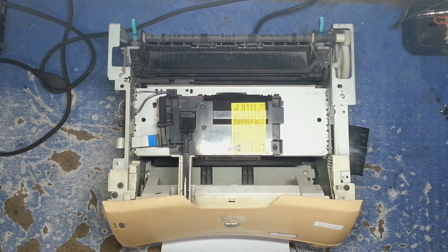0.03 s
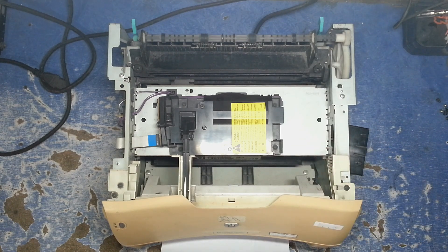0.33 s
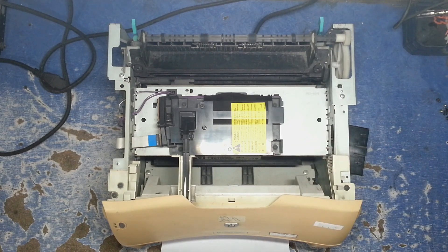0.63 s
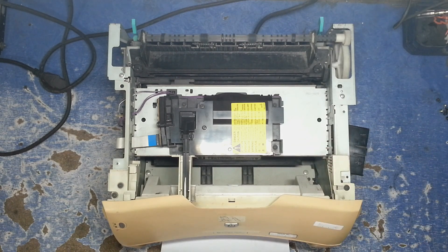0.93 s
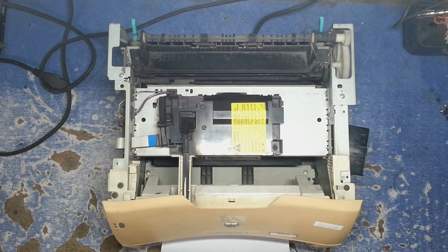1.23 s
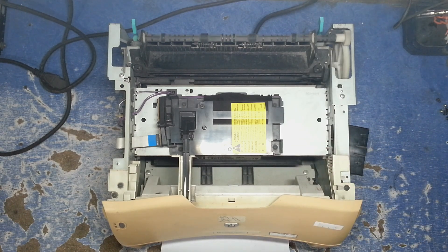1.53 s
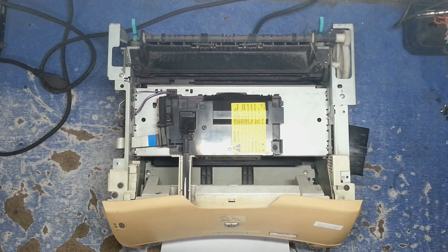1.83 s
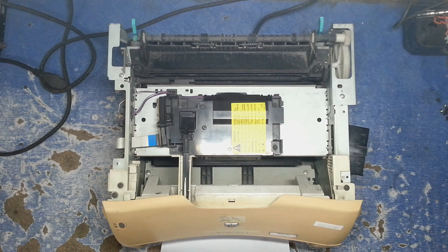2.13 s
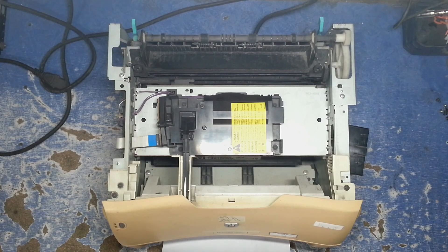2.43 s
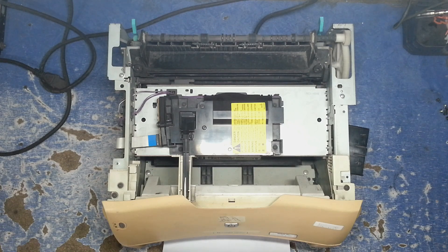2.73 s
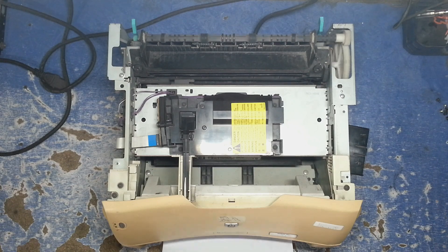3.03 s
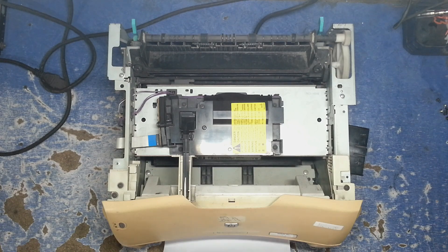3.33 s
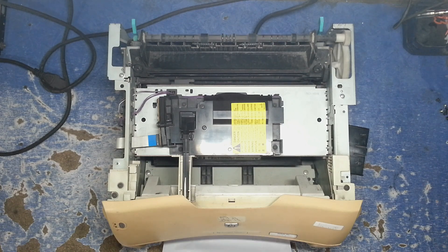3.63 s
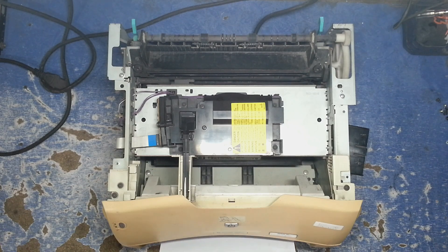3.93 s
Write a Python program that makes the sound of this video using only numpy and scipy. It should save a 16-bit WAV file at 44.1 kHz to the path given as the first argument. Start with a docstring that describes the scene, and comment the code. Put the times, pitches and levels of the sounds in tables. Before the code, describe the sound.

Close up in a small room, a laser printer whirs and whines while loose parts tap and a faint squeak rises. Then a solenoid snaps twice, a second apart, amid clacking levers, plastic latch clicks and rattling rollers.

```python
"""A motor whines and a plastic gear train whirs: an opened laser printer runs on a workshop floor.
Loose parts tap and a faint squeak rises. About two seconds in a solenoid snaps, and again a second later;
from the first snap on, the paper feed loads the gears, cams and levers clack and a sprung latch drops.
The stereo microphone is close, in a small room, with the machine a little to the right."""
import sys
import numpy as np
from scipy import signal
from scipy.fft import rfft, irfft, next_fast_len
from scipy.io import wavfile
from scipy.ndimage import map_coordinates

SR = 44100
rng = np.random.default_rng(int(sys.argv[2]) if len(sys.argv) > 2 else 0)


def waveform_to_disk(signal):
    """Save audio, clipped to [-1, 1], as 16-bit WAV at the path in sys.argv[1]."""
    frames = np.transpose(np.atleast_2d(signal))
    scaled = np.clip(frames, -1, 1) * 32767
    samples = np.round(scaled).astype(np.int16)
    wavfile.write(sys.argv[1], SR, samples)


N = 4 * SR

# load of the paper feed, heard as its rattle: time_s, level_db
FEED_LOAD = [(2.17, -58), (2.25, -40), (2.34, -39.5), (2.43, -30.5), (2.49, -43), (2.71, -45), (2.76, -36),
             (2.85, -37.5), (2.92, -45), (2.98, -33.5), (3.08, -43), (3.24, -30), (3.36, -38.5),
             (3.48, -37.5), (3.6, -49.5), (3.73, -48), (3.8, -35), (3.91, -39), (3.99, -32)]
# colour of the printer's frame: freq_hz, gain_db
FRAME_COLOUR = [(40, -36), (90, -7), (190, -9.5), (275, 2.5), (390, -1), (560, 3.5), (700, -6), (980, 3.5),
                (1150, 2.5), (1380, -8.5), (1650, -3), (2150, -3), (2700, -15.5), (4500, -24), (6300, -37),
                (9000, -30), (15000, -51.5)]
# where the microphone hears the frame: freq_hz, left_over_right_db
FRAME_PAN = [(100, 1), (300, 0.5), (1000, -4), (3500, -4.5), (12000, -12.5)]
FRAME_CUT_HZ = 150  # lowest pitch that the frame radiates well


def solenoid():
    """The steel armature slaps home in a few quick contacts and leaves its return spring sizzling."""
    # the solenoid pulls in: start_s, level_db, tilt_db_per_octave
    snaps = [(2.1873, -11.5, 0), (3.1781, -11.5, 0.7)]
    # the armature touches, seats and bounces: delay_s, gain_db
    contacts = [(.0005, 1.5), (.0033, 1), (.0062, -3.5), (0.0138, -11), (0.017, -15), (0.029, -20)]
    # ring of the armature: pitch_hz, gain_db, t60_s
    armature_modes = [(1556, 1, 0.05), (1650, 4, 0.059), (1794, 0, 0.034), (1925, -1, 0.03),
                      (2030, -1, 0.027), (2575, -4, 0.06), (2706, -11, 0.06), (3330, -17, 0.02),
                      (4370, -18.5, 0.059)]
    # crack of a contact: freq_hz, gain_db
    crack_colour = [(100, -46), (500, -29), (1000, -3.5), (1370, -12), (1620, 6), (2000, 7), (2300, -10),
                    (2600, 1), (3100, -12.5), (4100, -12), (5200, -20.5), (6200, -31.5), (8800, -17),
                    (11800, -24.5), (15000, -28.5)]
    # sizzle of the spring: freq_hz, gain_db
    spring_colour = [(2000, -55), (3600, 6), (5100, 5), (6300, -2), (8000, -2), (8900, -15), (10200, -11),
                     (11500, 6), (12600, -11), (14500, -9)]
    # where the microphone hears the snap: freq_hz, left_over_right_db
    snap_pan = [(60, 2), (150, 0.0), (380, 2), (950, -9), (2380, -2), (5980, -11.5), (15000, -20)]
    out = np.zeros((2, N))
    for start, db, tilt_db in snaps:
        for delay, contact_db in contacts:
            crack = blow(crack_colour, t60=0.027, tilt_db=tilt_db, modes=armature_modes, ring_db=0.5)
            add(out, start + delay, amp(db + contact_db - 4) * crack)
        spring_db = db - 26.5 + 6.1 * tilt_db  # a brighter snap sizzles louder
        add(out, start, amp(spring_db) * blow(spring_colour, t60=0.23))
    thin = low_cut(out, corner_hz=690)  # the small armature radiates no bass
    return in_room(spread(thin, snap_pan), wet_db=-11)


def latch():
    """A sprung plastic latch drops with a dry, bright snap."""
    # the latch drops: start_s, level_db, tilt_db_per_octave, t60_s, ring_db
    drops = [(2.9493, -23, -1, 0.057, 1.5), (3.410, -27, -3.5, 0.05, -2), (3.7516, -18.5, 2.5, 0.074, -3),
             (3.951, -28, 1.5, 0.082, -11)]
    # colour of the plastic: freq_hz, gain_db
    colour = [(60, -20), (170, -14), (300, -3), (600, 1.5), (750, -8), (1000, 2.5), (1380, -3), (1750, -3),
              (2100, 4), (2600, -10), (3000, -8.5), (3600, -17), (5300, -21), (6400, -32), (9000, -30.5),
              (15000, -45)]
    # its ring: pitch_hz, gain_db, t60_s
    modes = [(810, -2, 0.077), (986, 2, 0.079), (1132, 0.5, 0.069), (1590, 3, 0.032), (2090, 1.5, 0.044),
             (2207, -5, 0.038), (3017, -8, 0.064)]
    out = np.zeros((2, N))
    for start, db, tilt_db, t60, ring_db in drops:
        add(out, start, amp(db) * blow(colour, t60, tilt_db, modes, ring_db))
    return in_room(spread(low_cut(out, FRAME_CUT_HZ), FRAME_PAN), wet_db=-9.5)


def levers():
    """Cams and levers clack on the frame; light catches tick and loose parts tap."""
    # strikes on the frame: start_s, level_db, tilt_db_per_octave, t60_s
    clacks = [(2.255, -27.5, -2, 0.1), (2.303, -33.5, -7, 0.053), (2.367, -29.5, 1.5, 0.13),
              (2.392, -41, 4, 0.016), (2.426, -30, -5.5, 0.071), (2.444, -29.5, 1, 0.075),
              (2.736, -30.5, 1, 0.07), (2.752, -31.5, -0.5, 0.059), (2.795, -37.5, -6.5, 0.047),
              (2.970, -30, 1.5, .09), (2.996, -31, 0, 0.096), (3.027, -27.5, -0.5, 0.055),
              (3.046, -29, -2, 0.06), (3.099, -32.5, -2.5, 0.05), (3.124, -32, -2.5, 0.035),
              (3.146, -34.5, -7, 0.036), (3.234, -26, 1, 0.087), (3.305, -31.5, -12, 0.025),
              (3.336, -33, 1.5, 0.011), (3.372, -32.5, 1.5, 0.06), (3.426, -27.5, -6, 0.059),
              (3.79, -28.5, -4.5, 0.017), (3.808, -31, -5.5, 0.051), (3.863, -32.5, -0.5, 0.053),
              (3.958, -30.5, -3, 0.027), (3.974, -31.5, 1, 0.033)]
    # ring of the frame: pitch_hz, gain_db, t60_s
    frame_modes = [(269.3, -12.5, 0.12), (586.4, -3.5, 0.14), (764, 3.5, 0.062), (983, -5, 0.1),
                   (1145, -2, 0.12), (1550, 2, 0.033), (2100, -6.5, 0.036), (3170, -10, 0.028)]
    # light catches, and the thin ringing tail of the latch that drops at 3.75 s: start_s, level_db, t60_s
    ticks = [(2.442, -42.5, 0.085), (2.785, -47.5, 0.017), (2.995, -56, .02), (3.434, -39.5, 0.054),
             (3.752, -37, 0.21), (3.934, -48, 0.018)]
    # their colour: freq_hz, gain_db
    tick_colour = [(1000, -15), (3400, 7.5), (4200, -3), (5150, 0), (6200, -14), (9000, -3), (15000, -14)]
    # their thin metallic ring: pitch_hz, gain_db, t60_s
    tick_modes = [(4100, 1, 0.066), (5060, -5, .07)]
    # a catch skips over its edge in a quick run: start_s, level_db
    slips = [(2.747, -37.5), (2.754, -37.5), (2.759, -42)]
    # ring of that catch: pitch_hz, gain_db, t60_s
    slip_modes = [(1940, 3, 0.036), (2660, 0, .03), (3080, -6, .03), (3240, -3.5, 0.038), (3650, -6, .03)]
    # loose parts ping while the gears idle: start_s, level_db, pitch_hz
    taps = [(0.1643, -32.5, 1746), (0.264, -42.5, 1770), (1.392, -37, 990), (1.549, -38.5, 1730),
            (1.617, -41.5, 1780), (1.776, -40.5, 1100)]
    out = np.zeros((2, N))
    for start, db, tilt_db, t60 in clacks:
        modes = [(hz, gain_db + tilt_db * np.log2(hz / 1000), life) for hz, gain_db, life in frame_modes]
        add(out, start, amp(db) * blow(FRAME_COLOUR, t60, tilt_db, modes, ring_db=-1.5))
    for start, db, t60 in ticks:
        add(out, start, amp(db) * blow(tick_colour, t60, modes=tick_modes, ring_db=-4))
    for start, db in slips:
        add(out, start, amp(db) * blow(tick_colour, t60=0.015, tilt_db=-5, modes=slip_modes, ring_db=8))
    for start, db, hz in taps:
        ping = blow(FRAME_COLOUR, t60=0.02, tilt_db=3, modes=[(hz, 0, 0.028)], ring_db=4)
        add(out, start, amp(db) * ping)
    return in_room(spread(low_cut(out, FRAME_CUT_HZ), FRAME_PAN), wet_db=-11)


def feed():
    """The light parts of the loaded paper feed rattle in the frame and its rollers rumble."""
    # swells of the rollers: centre_s, level_db, sigma_s
    thumps = [(2.822, -41.5, 0.045), (3.342, -44.5, 0.049), (3.78, -47, 0.04)]
    # their rumble: freq_hz, gain_db
    rumble_colour = [(30, -32), (60, -12), (85, -10), (170, -8), (300, -1), (800, -56)]
    t = np.arange(N) / SR
    shaking = rush(FRAME_COLOUR, FRAME_PAN, drive=amp(1.4 * wobble(130)))
    rattle = amp(curves(FEED_LOAD)[0]) * unit(low_cut(shaking, corner_hz=155))
    swell = sum(amp(db) * np.exp(-0.5 * ((t - centre) / sigma) ** 2) for centre, db, sigma in thumps)
    return rattle + swell * rush(rumble_colour, FRAME_PAN)


def gears():
    """The gear train whirs steadily, its teeth knock irregularly and nearby parts ring along."""
    # the running gear train: freq_hz, gain_db
    whir_colour = [(18, -69), (30, -33), (69, -22), (79, -26), (92, -5), (228, -10.5), (267, -3),
                   (384, -8.5), (448, -9.5), (567, -6.5), (629, -5.5), (680, -13.5), (905, -8.5),
                   (978, -11.5), (1410, -11), (1690, -11), (1970, -11), (2250, -13), (2700, -17.5),
                   (4310, -23), (6360, -32), (13500, -27), (15000, -36)]
    # where the microphone hears it: freq_hz, left_over_right_db
    whir_pan = [(60, 1), (150, 0.5), (380, 0), (950, -4.5), (2380, -1), (5980, 1.5), (15000, 7)]
    # parts that the gears keep ringing: pitch_hz, width_hz, level_db
    resonances = [(273, 77, -52.5), (455, 12.6, -54.5), (506.7, 12, -55), (828, 170, -52.5), (967, 58, -61),
                  (1150, 35, -58.5), (2323, 140, -63)]
    knocks_per_s, knock_decay_s = 210, 0.0015
    out = amp(-39.5) * rush(whir_colour, whir_pan)
    impacts = (rng.random(N) < knocks_per_s / SR) * amp(2.2 * rng.standard_normal(N))
    knocks = signal.lfilter([1], [1, -np.exp(-1 / (knock_decay_s * SR))], impacts)
    out += amp(-46) * rush(FRAME_COLOUR, FRAME_PAN, drive=knocks)
    for pitch, width, db in resonances:
        band = lambda hz: (1j * hz * width / (pitch ** 2 - hz * hz + 1j * hz * width)) ** 2
        ring = filtered(rng.standard_normal((2, N)), band)
        out += amp(db) * unit(spread(ring, whir_pan))
    return out


def motor():
    """Tones locked to one shaft flutter; most of them grow when the feed loads the gears."""
    # the motor and its gear meshes: pitch_hz
    pitches = [101.3, 639.1, 958.7, 1340, 1712.4, 2276.9, 4237]
    # the tone at each pitch: level_db, flutter_db, full_load_gain_db, left_over_right_db
    tones = [(-62, -0.5, 2, 0), (-48.5, 1, 5, 1), (-51.5, 4.5, 14, -4), (-60, 4.5, 12, 6),
             (-55.5, -1, -4, 8), (-53, 2, 7.5, -14.5), (-66.5, 3, -9, 5)]
    speed_wander, phase_flutter_rad = 0.000766, 0.34
    load = amp(curves(FEED_LOAD)[0])
    shaft_time = np.cumsum(1 + speed_wander * wobble(8)) / SR
    out = np.zeros((2, N))
    for hz, (db, flutter_db, load_db, pan_db) in zip(pitches, tones):
        flutter = amp(flutter_db * wobble(38))
        phase = 2 * np.pi * hz * shaft_time + phase_flutter_rad * wobble(45)
        gain = amp(db + load_db * load / load.max())
        out += sides(pan_db)[:, None] * unit(flutter * np.sin(phase)) * gain
    return out


def squeak():
    """A faint, thin whistle glides upward once."""
    # path of the whistle: time_s, pitch_hz, level_db
    glide = [(.22, 6300, -75), (.232, 6540, -57), (.256, 7000, -63), (.275, 7300, -75), (.34, 8280, -68),
             (.38, 9050, -61), (.403, 9400, -57), (.42, 9450, -75)]
    hz, db = curves(glide)
    t = np.arange(N) / SR
    sounding = (t > glide[0][0]) & (t < glide[-1][0])
    gain = amp(db + 1.6 * wobble(200))
    phase = 2 * np.pi * np.cumsum(hz * (1 + 0.009 * wobble(500))) / SR
    return gain * np.sin(phase) * sounding


def in_room(x, wet_db):
    """The direct sound plus the workshop's short reverberation."""
    # decay of the room: freq_hz, t60_s
    decay = [(150, 0.14), (1000, 0.12), (4000, 0.2), (12000, 0.13)]
    hz, t, noise = signal.stft(rng.standard_normal((2, SR // 2)), SR, nperseg=256)
    fade = amp(-60 * t / along(decay, hz)[:, None])
    build_up = 1 - np.exp(-t / 0.006)
    tail = signal.istft(noise * fade * build_up, SR, nperseg=256)[1]
    return x + amp(wet_db) * signal.fftconvolve(x, tail / np.linalg.norm(tail[0]), axes=1)[:, :N]


def blow(colour, t60, tilt_db=0, modes=(), ring_db=0):
    """One contact as a mid/side pair, rms 1 over its first 10 ms: a noise burst plus the part's modes."""
    attack_s = 0.0006
    t = np.arange(SR // 4) / SR
    unit_onset = lambda x: x / np.sqrt(np.mean(x[..., :SR // 100] ** 2) + 1e-20)
    octaves = lambda hz: np.log2(np.clip(hz, 120, 8000) / 1000)
    tint = lambda hz: causal(amp(along(colour, hz) + tilt_db * octaves(hz)))
    burst = rng.standard_normal((2, len(t))) * amp(-60 * t / t60)
    contact = unit_onset(filtered(burst, tint))
    if len(modes):
        ring = np.zeros(len(t))
        for k, (hz, db, life) in enumerate(modes):
            envelope = amp(db + rng.normal(0, 1.5) - 60 * t / life)
            ring += envelope * np.sin(2 * np.pi * hz * t + np.pi * k)
        contact[0] += amp(ring_db) * unit_onset(ring)
    return unit_onset(contact * (1 - np.exp(-t / attack_s)))


def rush(colour, pan, drive=1):
    """Stereo noise of rms 1, driven by an envelope and then coloured."""
    noise = rng.standard_normal((2, N)) * drive
    coloured = filtered(noise, lambda hz: amp(along(colour, hz)))
    return unit(spread(coloured, pan))


def spread(pair, pan):
    """Two unrelated signals, taken as mid and side, become a stereo pair that is alike in the bass."""
    # likeness of left and right at the microphone: freq_hz, correlation
    likeness = [(60, 0.87), (150, 0.65), (380, 0.8), (950, 0.28), (2380, -0.045), (5980, 0.015),
                (15000, 0.027)]
    angle = lambda hz: np.arccos(np.clip(along(likeness, hz), -1, 1)) / 2
    mid, side = filtered(pair, lambda hz: np.array([np.cos(angle(hz)), np.sin(angle(hz))]))
    return filtered(np.array([mid + side, mid - side]), lambda hz: sides(along(pan, hz)))


def sides(db):
    """Left and right gains for a level difference."""
    return amp(np.array([db / 2, -db / 2]))


def low_cut(x, corner_hz):
    """Small parts radiate little below a corner frequency."""
    return filtered(x, lambda hz: (1j * hz / (corner_hz + 1j * hz)) ** 2)


def filtered(x, response):
    """Filter x by a response given as a function of frequency."""
    n = x.shape[-1]
    padded = next_fast_len(n + SR // 10)
    return irfft(rfft(x, padded) * response(np.fft.rfftfreq(padded, 1 / SR)), padded)[..., :n]


def causal(gain):
    """The minimum-phase response with this gain."""
    cepstrum = irfft(np.log(np.maximum(gain, 1e-6)))
    half = len(cepstrum) // 2
    cepstrum[1:half] *= 2
    cepstrum[half + 1:] = 0
    return np.exp(rfft(cepstrum))


def along(points, hz):
    """Interpolate (freq_hz, value) points on a log frequency axis."""
    freqs, values = np.transpose(points)
    return np.interp(np.log(hz + 1), np.log(freqs + 1), values)


def curves(rows):
    """One value per sample for each column after the time."""
    times, *columns = np.transpose(rows)
    return [np.interp(np.arange(N) / SR, times, column) for column in columns]


def wobble(rate):
    """A smooth random curve, rate knots a second."""
    return map_coordinates(rng.standard_normal(N // 20), [np.arange(N) * rate / SR], mode="mirror")


def add(track, start_s, sound):
    """Mix a sound in at start_s."""
    part = track[:, round(start_s * SR):][:, :sound.shape[1]]
    part += sound[:, :part.shape[1]]


def amp(db):
    """Decibels to gain."""
    return 10 ** (np.asarray(db) / 20)


def unit(x):
    """Scale to rms 1."""
    return x / np.sqrt(np.mean(x ** 2) + 1e-20)


def scene():
    """All parts of the printer together."""
    return motor() + gears() + feed() + levers() + latch() + solenoid() + squeak()


def record(dry):
    """Sound reaches the right microphone first; the recorder rounds high peaks and limits the band."""
    bass_lead_s, ceiling, top_hz = 0.00016, 0.82, 14650
    half_phase = lambda hz: np.pi * hz * bass_lead_s / (1 + (hz / 1500) ** 2)
    mics = filtered(dry, lambda hz: np.exp(1j * half_phase(hz) * np.array([[-1], [1]])))
    rounded = mics / (1 + (mics / ceiling) ** 4) ** (1 / 4)
    return filtered(rounded, lambda hz: 1 / (1 + (hz / top_hz) ** 250))


dry = scene()
out = record(dry)
waveform_to_disk(out)
```